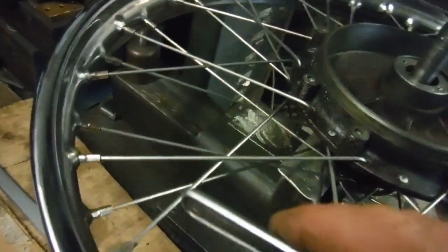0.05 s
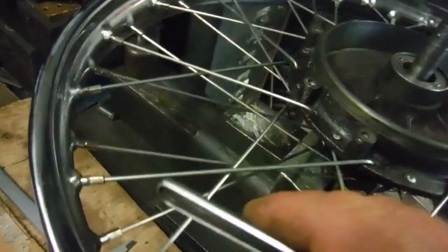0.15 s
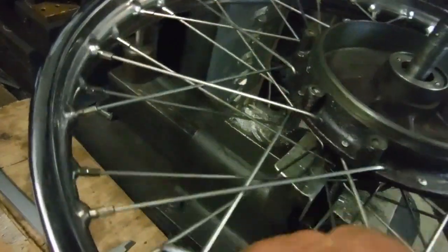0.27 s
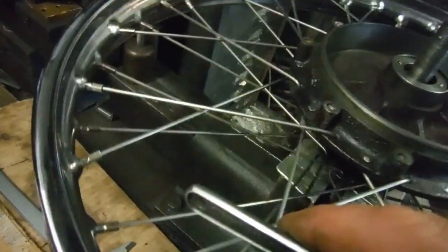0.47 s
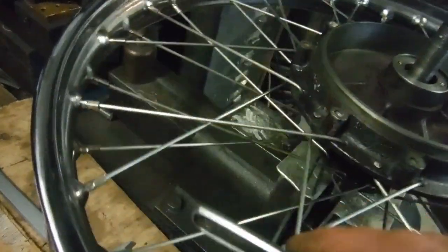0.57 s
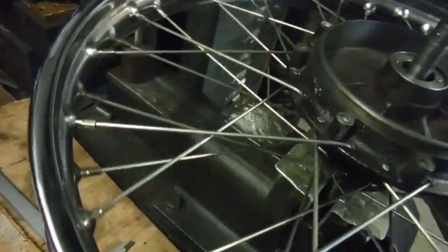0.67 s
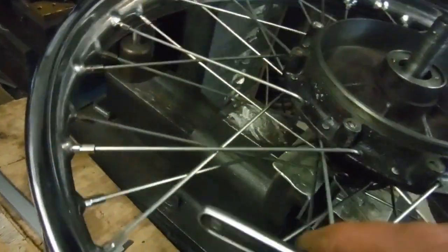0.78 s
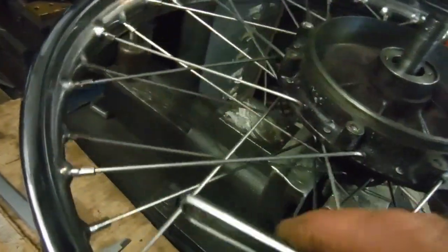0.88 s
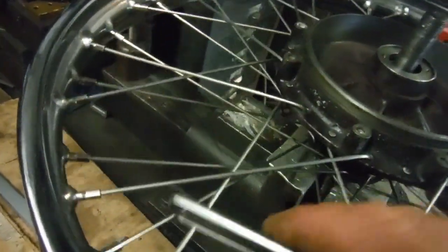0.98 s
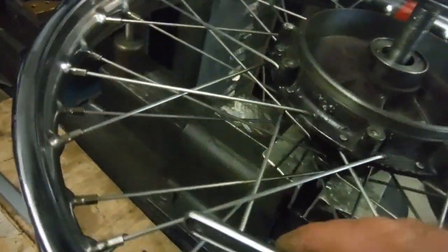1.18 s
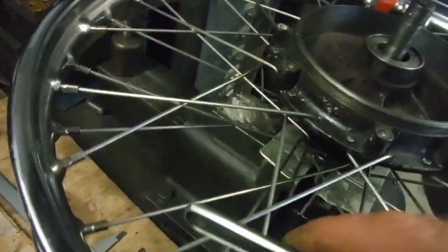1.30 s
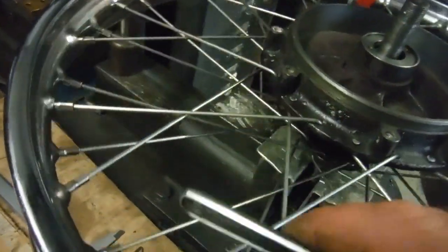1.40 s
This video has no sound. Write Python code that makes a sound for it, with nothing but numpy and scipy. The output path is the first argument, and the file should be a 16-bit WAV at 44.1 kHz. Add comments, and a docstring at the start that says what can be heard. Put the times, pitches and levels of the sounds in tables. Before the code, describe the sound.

Three sharp metallic taps on wire wheel spokes, ringing briefly in a quiet workshop.

```python
"""A wire wheel turns slowly in a workshop, still ringing faintly over quiet room noise and a low hum.
A steel tool grazes one spoke, then gives three firm taps. Each impact excites the wheel's strong normal
modes, in a mix set by the spoke that is struck, and a dense jangle of weaker ones. Just after each tap
the tool chatters briefly; then, as the free vibration decays, the rim's close pair of modes beats and
the ringing wavers as the wheel turns."""
import sys
import numpy as np
from scipy import signal
from scipy.fft import rfft, irfft
from scipy.io import wavfile

SR = 44100
rng = np.random.default_rng(int(sys.argv[2]) if len(sys.argv) > 2 else 0)


def unload_audio(sound):
    """Save the sound as a 16-bit wav file, at the path given as the first command line argument."""
    columns = np.transpose(np.atleast_2d(sound))
    # keep every value between -1 and 1, then stretch to whole-number steps
    steps = np.round(np.clip(columns, -1, 1) * 32767)
    wavfile.write(sys.argv[1], SR, steps.astype(np.int16))


N = 63945

# room noise spectrum: f/Hz, level in a 1 kHz band/dB
ROOM_SPECTRUM = [(20, -90), (45, -75), (110, -72), (200, -63), (350, -62), (500, -65.5), (900, -62),
                 (1500, -61), (2500, -72), (4500, -79.5), (8000, -82.5), (15500, -94.5)]
# course of the hum: t/s, level/dB, f/Hz
HUM_TRACK = [(0, -65.5, 65.9), (.38, -64, 71.6), (.48, -78.5, 71.4), (.66, -70.5, 49.9),
             (0.941, -86, 53.66), (1.151, -74, 62.8), (1.45, -77, 68.6)]
# modes already ringing at the start: f/Hz, level/dB, t60/s
RESIDUAL_MODES = [(1008, -46.5, 3.3), (1446, -53.5, .9), (1287, -52.5, 3.6)]
# the few modes that the faint touch excites: f/Hz, level/dB
TOUCH_MODES = [(1019, -49), (1449, -42.5), (1505, -42.5), (1524, -39), (2590, -51), (2656, -49),
               (2888, -54.5)]
# strong modes of the spokes: f/Hz, base t60/s, base level/dB for tap 1, 2, 3
SPOKE_MODES = [(356.0, 0.65, -64.0, -57.0, -55.0), (806.0, 0.51, -65.0, -52.0, -58.0),
               (1011, 0.88, -60, -37.5, -22.5), (1019, 0.68, -25, -44, -44), (1074, 0.6, -38, -44, -40),
               (1194, 0.62, -22, -29, -33.5), (1288.0, 0.91, -33.0, -45.0, -42.0),
               (1352.0, 0.98, -41.0, -42.0, -58.0), (1374.0, 0.73, -45.0, -35.0, -53.0),
               (1449, 1.9, -39, -62, -52), (1505.0, 0.51, -41.0, -35.0, -44.0),
               (1524.0, 0.24, -27.0, -27.0, -41.0), (1764.0, 0.3, -21.0, -26.0, -32.0),
               (1821.0, 0.19, -30.0, -25.0, -31.0), (2056.0, 0.24, -20.0, -25.0, -31.0),
               (2156.0, 0.28, -65.0, -24.0, -48.0), (2254.0, 0.28, -34.0, -36.0, -42.0),
               (2321.0, 0.38, -30.0, -33.0, -59.0), (2497.0, 0.44, -34.0, -44.0, -49.0),
               (2590.0, 0.46, -34.0, -52.0, -39.0), (2656.0, 0.41, -33.0, -31.0, -50.0),
               (2684.0, 0.28, -40.0, -33.0, -30.0), (2888, 0.72, -42, -40, -46),
               (2994.0, 0.39, -65.0, -42.0, -39.0), (3022.0, 0.39, -29.0, -48.0, -33.0),
               (3080.0, 0.22, -29.0, -29.0, -29.0), (3218.0, 0.28, -26.0, -65.0, -32.0),
               (3234.0, 0.33, -65.0, -32.0, -34.0), (3359.0, 0.26, -30.0, -49.0, -32.0),
               (3406.0, 0.31, -30.0, -27.0, -40.0), (3520, 0.2, -29, -22, -26),
               (3585.0, 0.26, -29.0, -23.0, -36.0), (3643.0, 0.2, -65.0, -65.0, -28.0),
               (3680.0, 0.4, -52.0, -39.0, -40.0), (3757, 0.24, -27, -25, -33),
               (3849.0, 0.22, -32.0, -65.0, -65.0), (3943.0, 0.3, -33.0, -65.0, -65.0),
               (4213, 0.38, -41, -36, -65), (4246.0, 0.23, -28.0, -31.0, -65.0),
               (4436.0, 0.22, -22.0, -39.0, -28.0), (4830.0, 0.28, -53.0, -40.0, -65.0),
               (5060, 0.2, -65, -65, -29), (5210.0, 0.14, -21.0, -29.0, -65.0),
               (5906.0, 0.13, -21.0, -65.0, -65.0), (6940, 0.14, -36, -60, -26),
               (7620, 0.12, -30, -20, -32), (8400, 0.12, -65, -22, -38)]
# how far weak modes gather round strong ones: f/Hz, degree from 0 to 1
CLUSTERING = [(800, 0), (1000, 1), (4800, 1), (6200, 0)]
# spectrum of the dense weak modes: f/Hz, base level in a 1 kHz band/dB for tap 1, 2, 3
JANGLE_SPECTRUM = [ (200, -69, -54, -69.5), (700, -45.5, -59.5, -51.5), (860, -52, -51.5, -48.5),
                   (1040, -36.5, -42.5, -35.5), (1506, -34, -35.5, -39.5), (1900, -40, -38, -40),
                   (2508, -33.5, -35, -38.5), (3505, -30, -32.5, -32.5), (4610, -29, -31.5, -29.5),
                   (6190, -34.5, -43, -37.5), (7820, -26.5, -27.5, -29), (9220, -41, -38.5, -38.5),
                   (9700, -29, -38, -37), (12330, -46.5, -47, -51), (15560, -60.5, -62.5, -72.5)]
# their decay: f/Hz, base t60/s
JANGLE_DECAY = [(300, 0.3), (800, 0.23), (1300, 1), (2000, .3), (2800, .35), (4000, 0.27), (5800, 0.24),
                (7800, 0.23), (11000, 0.16), (15000, 0.19)]
# firm taps: t/s, spoke mode gain/dB, jangle gain/dB, t60 factor, jangle hold/s,
# relative amplitude of the rim's twin mode (negative when it starts in antiphase)
FIRM_TAPS = [(0.2425, .5, 0.5, 1, 0.026, -.75), (0.6583, 0, 1.5, 1.018, 0.015, -.7),
             (1.0685, 0, 1.5, 0.96, 0.018, 0.29)]
# the rim's mode pair: f/Hz, t60/s, level/dB for tap 1, 2, 3
RIM_PAIR = (1932.5, 1.53, -41, -50.5, -41.5)
# the tool's chatter against the spoke: t/s, gain/dB
REBOUNDS = [(.270, 1), (0.2804, -9), (0.68, -7), (1.093, -2)]

TOUCH_S, TOUCH_CLATTER_DB, TOUCH_TREBLE_HZ = 0.012, -10, 2300
MODE_RISE_S, JANGLE_RISE_S = 0.0078, 0.0007
SPOKE_TWIN, SPOKE_SPLIT_HZ, RIM_SPLIT_HZ = 0.098, 1.47, 7.3  # a twin is weaker and slightly higher
WAVER_PER_KHZ, WAVER_HZ_PER_KHZ = 0.06, 4.0  # depth and top rate grow with the mode's frequency
CLUSTER_WIDTH, VALLEY_DB = 0.007, -8  # width as a fraction of the frequency
CLATTER_DB, LINGER_DB, LINGER_TREBLE_HZ = 0.5, -6, 5800
CLATTER_T60_FACTOR, CHATTER_T60_FACTOR = 0.48, 0.2
CUTOFF_HZ = 15900
GRID_HZ = np.fft.rfftfreq(SR, 1 / SR)  # 1 Hz steps


def amp(db):
    """Amplitude ratio of a level in decibels."""
    return 10 ** (np.asarray(db) / 20)


def read(points, hz):
    """Interpolation of (f/Hz, value) points on a logarithmic frequency axis."""
    f, value = np.transpose(points)
    return np.interp(np.log(hz + 1), np.log(f + 1), value)


def add(mix, s, sound):
    """Superposition: a sound joins the mix at s seconds."""
    part = mix[max(round(s * SR), 0):][:len(sound)]
    part += sound[:len(part)]


def room_noise():
    """Stationary noise: white noise weighted by the workshop's spectrum."""
    colour = amp(read(ROOM_SPECTRUM, np.fft.rfftfreq(N, 1 / SR)))
    return irfft(rfft(rng.standard_normal(N)) * colour, N) * np.sqrt(SR / 2000)


def hum():
    """Amplitude and frequency modulation: a faint low tone wanders in level and pitch."""
    t = np.arange(N) / SR
    s, db, hz = np.transpose(HUM_TRACK)
    phase = 2 * np.pi * np.cumsum(np.interp(t, s, hz)) / SR
    return np.sqrt(2) * amp(np.interp(t, s, db)) * np.sin(phase)


def residual_ringing():
    """Damped free vibration: modes already in motion decay exponentially."""
    t = np.arange(N) / SR
    return sum(amp(db - 60 * t / t60) * np.sin(2 * np.pi * f * t) for f, db, t60 in RESIDUAL_MODES)


def touch():
    """A soft contact acts as a low-pass filter: grazing a spoke excites few modes and little treble."""
    out = np.zeros(N)
    for f, db in TOUCH_MODES:
        t60 = min(SPOKE_MODES, key=lambda row: abs(row[0] - f))[1]
        add(out, TOUCH_S, mode(f, t60, db, SPOKE_TWIN, SPOKE_SPLIT_HZ))
    soft = clusters(GRID_HZ) / (1 + (GRID_HZ / TOUCH_TREBLE_HZ) ** 5)
    add(out, TOUCH_S, amp(TOUCH_CLATTER_DB) * jangle(0, soft, CLATTER_T60_FACTOR, hold_s=0))
    return out


def mode(hz, t60, db, twin, split_hz):
    """A damped normal mode swells as the blow spreads round the wheel, beats with its twin and wavers."""
    t = np.arange(min(N, int(t60 * SR))) / SR
    slow = t[::32]  # coarse time steps for the envelope
    beat = (1 + twin * np.exp(2j * np.pi * split_hz * slow)) / (1 + abs(twin))
    depth, rate_hz = WAVER_PER_KHZ * hz / 1000, WAVER_HZ_PER_KHZ * hz / 1000
    waver = (1 + depth * drift(slow, rate_hz)) / np.hypot(1, depth)
    rise = 1 - np.exp(-slow / MODE_RISE_S)
    envelope = beat * waver * rise * amp(db - 60 * slow / t60)
    carrier = np.exp(2j * np.pi * (hz * t + rng.random()))
    return (np.interp(t, slow, envelope) * carrier).real


def drift(t, hz, count=6):
    """Random phasors, none faster than hz, sum to a slow wander of unit mean power."""
    rate, phase = rng.uniform(-1, 1, (2, count))
    knots = np.linspace(0, t[-1], num=200)
    phasors = np.exp(2j * np.pi * (hz * rate * knots[:, None] + phase))
    return np.interp(t, knots, phasors.sum(1) / np.sqrt(count))


def clusters(hz):
    """Near-degeneracy: the spokes are almost alike, so weak midrange modes gather round strong ones."""
    detuning = np.min([abs(hz / f - 1) for f, *_ in SPOKE_MODES], axis=0)
    closeness = np.exp(-(detuning / CLUSTER_WIDTH) ** 2)
    return amp(VALLEY_DB * read(CLUSTERING, hz) * (0.5 - closeness))


def jangle(tap, weights, t60_factor, hold_s, bands=16):
    """Frequency-dependent damping: the close modes of all the spokes hold, then die, treble first."""
    t = np.arange(SR) / SR
    colour = weights * amp(read([(row[0], row[1 + tap]) for row in JANGLE_SPECTRUM], GRID_HZ))
    spectrum = colour * np.exp(2j * np.pi * rng.random(len(GRID_HZ))) * SR / np.sqrt(2000)
    age = np.hypot(t, hold_s) - hold_s  # the decay sets in gradually
    edges = np.append(150, np.geomspace(900, 17000, bands))
    out = np.zeros(SR)
    for lo, hi in zip(edges, edges[1:]):
        band = irfft(spectrum * ((GRID_HZ >= lo) & (GRID_HZ < hi)), SR)
        t60 = t60_factor * read(JANGLE_DECAY, np.sqrt(lo * hi))
        out += band * amp(-60 * age / t60)
    return out * (1 - np.exp(-t / JANGLE_RISE_S))


def firm_taps():
    """Impulse response: each tap rings spokes and rim, with a dense clatter and lingering weak lines."""
    out = np.zeros(N)
    dense = clusters(GRID_HZ)
    sparse = dense * weak_lines() / np.hypot(1, GRID_HZ / LINGER_TREBLE_HZ)
    rim_hz, rim_t60, *rim_db = RIM_PAIR
    for tap, (s, modes_db, jangle_db, t60_factor, hold_s, rim_twin) in enumerate(FIRM_TAPS):
        for f, t60, *levels in SPOKE_MODES:
            add(out, s, mode(f, t60 * t60_factor, modes_db + levels[tap], SPOKE_TWIN, SPOKE_SPLIT_HZ))
        add(out, s, mode(rim_hz, rim_t60, rim_db[tap], rim_twin, RIM_SPLIT_HZ))
        clatter = jangle(tap, dense, t60_factor * CLATTER_T60_FACTOR, hold_s)
        add(out, s, amp(jangle_db + CLATTER_DB) * clatter)
        add(out, s, amp(jangle_db + LINGER_DB) * jangle(tap, sparse, t60_factor, hold_s))
    return out


def weak_lines(count=170):
    """A line spectrum: one weak mode falls at random in each band and carries that band's power."""
    edges = np.geomspace(150, 17000, count + 1)
    lines, width = np.zeros(len(GRID_HZ)), np.diff(edges)
    lines[(edges[:-1] + width * rng.random(count)).astype(int)] = np.sqrt(width)
    return lines


def chatter():
    """Repeated impact: the tool meets the spoke again just after a tap and briefly renews its jangle."""
    out, dense = np.zeros(N), clusters(GRID_HZ)
    for s, db in REBOUNDS:
        last_tap = sum(row[0] < s for row in FIRM_TAPS) - 1
        add(out, s, amp(db) * jangle(last_tap, dense, CHATTER_T60_FACTOR, hold_s=0))
    return out


def scene():
    """Sound pressures of wheel and room add at one close microphone."""
    return (firm_taps() + chatter() + touch() + residual_ringing() + room_noise() + hum())[None]


def record(dry):
    """Band limiting: a linear-phase low-pass filter removes the highest treble."""
    lowpass = signal.firwin(255, CUTOFF_HZ, window=("kaiser", 9), fs=SR)
    return signal.oaconvolve(dry, lowpass[None], "same")


dry = scene()
out = record(dry)
unload_audio(out)
```